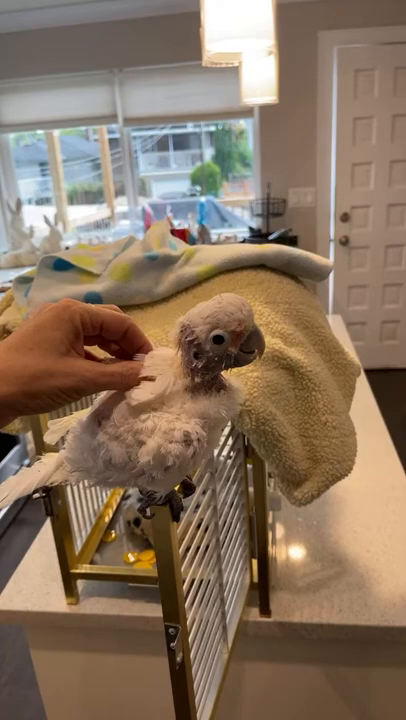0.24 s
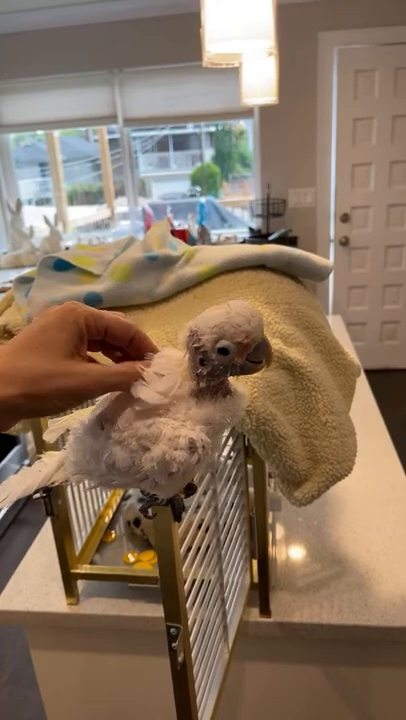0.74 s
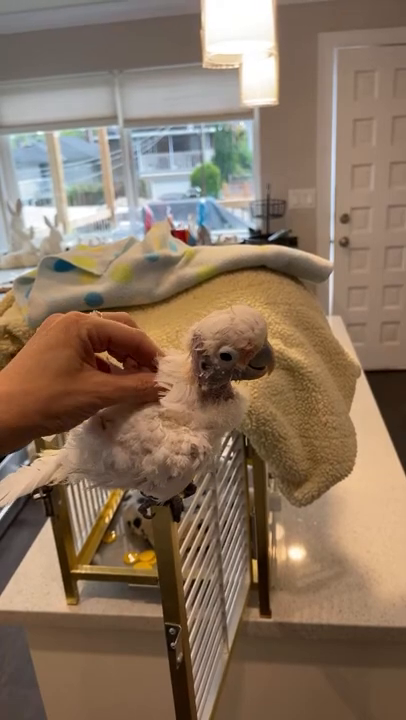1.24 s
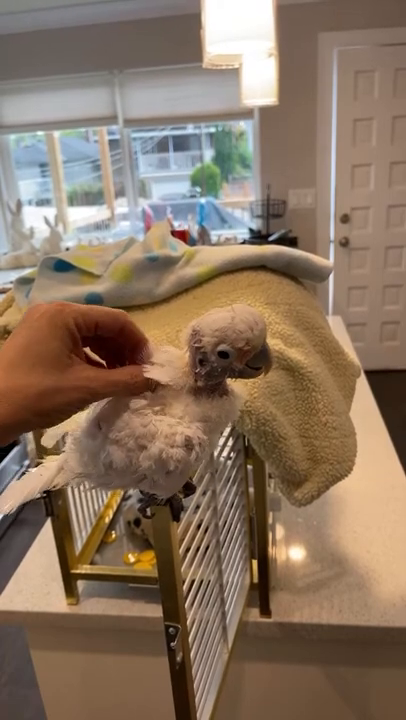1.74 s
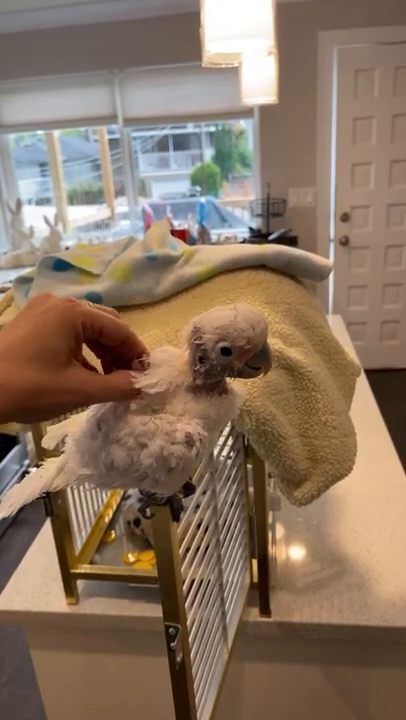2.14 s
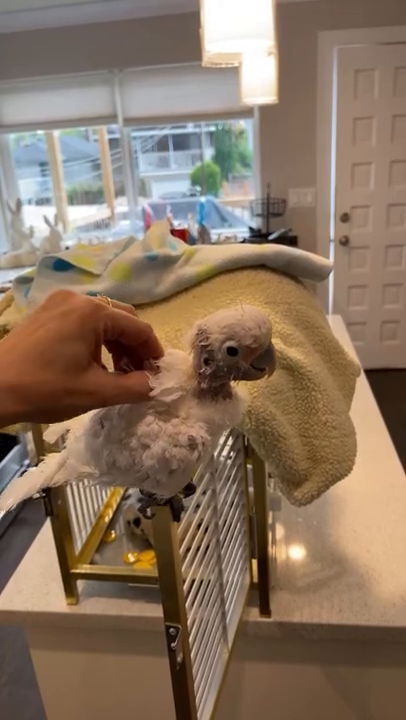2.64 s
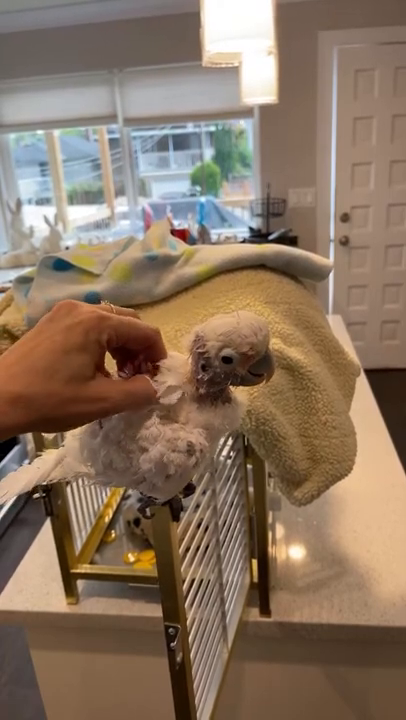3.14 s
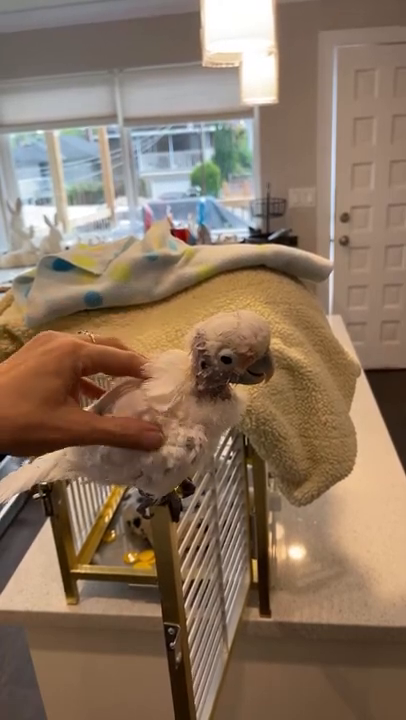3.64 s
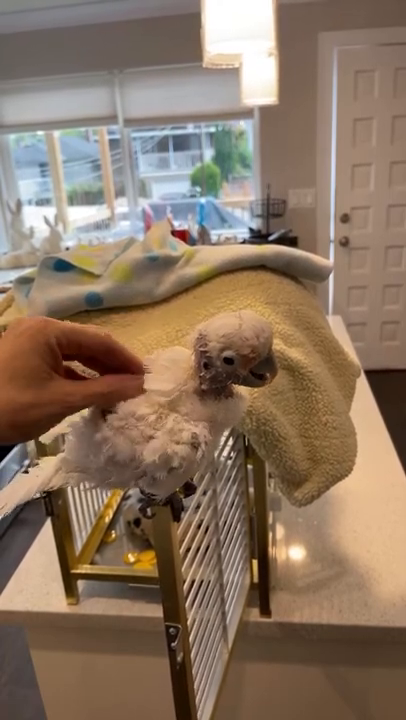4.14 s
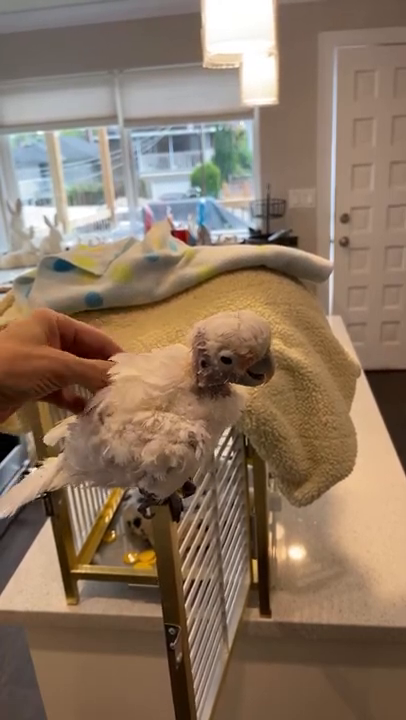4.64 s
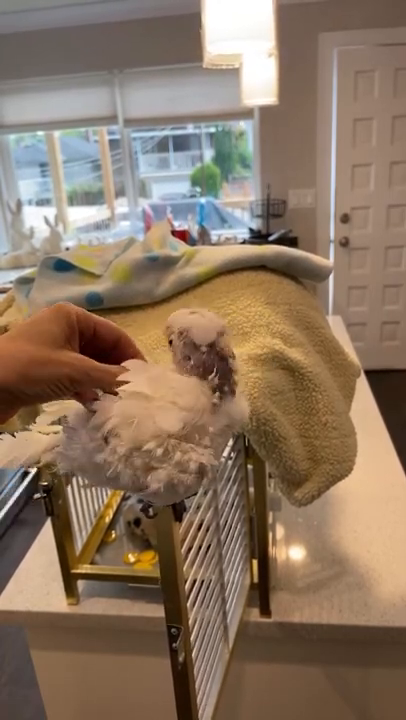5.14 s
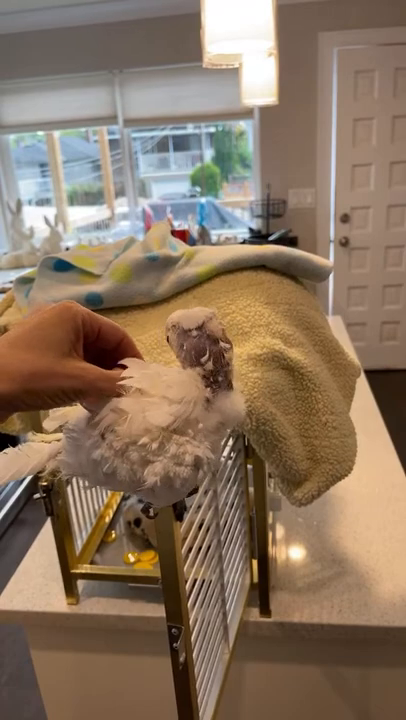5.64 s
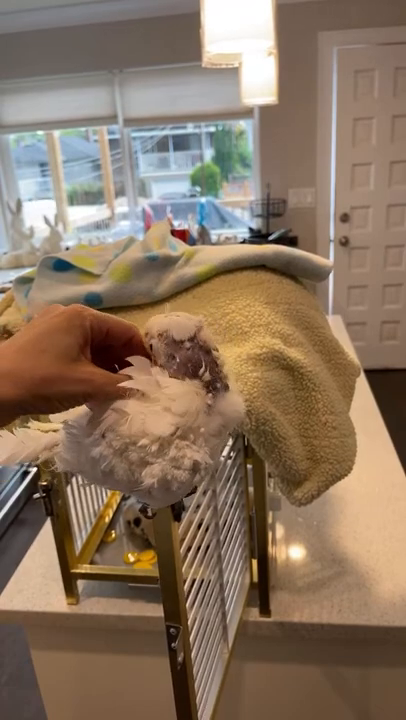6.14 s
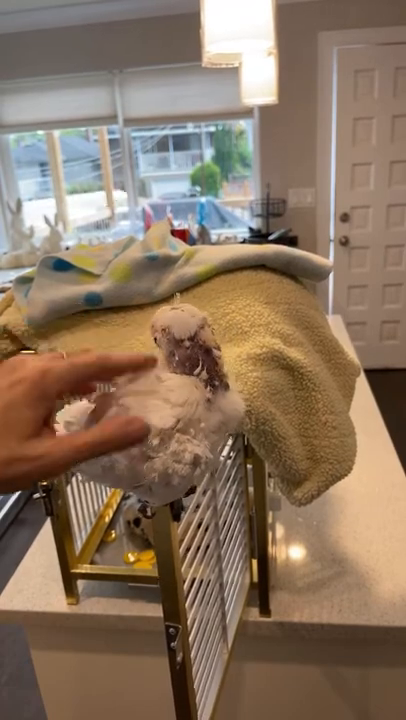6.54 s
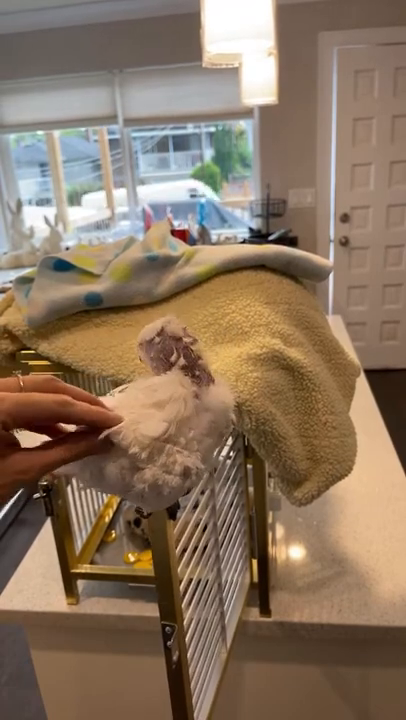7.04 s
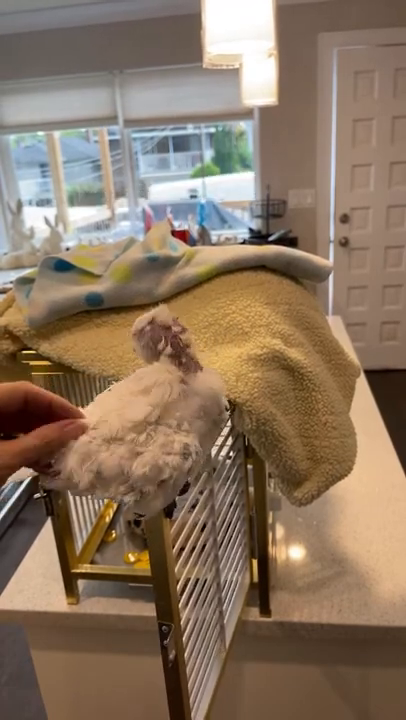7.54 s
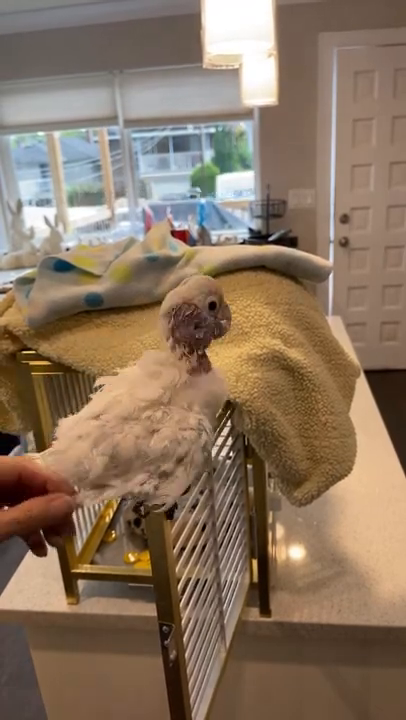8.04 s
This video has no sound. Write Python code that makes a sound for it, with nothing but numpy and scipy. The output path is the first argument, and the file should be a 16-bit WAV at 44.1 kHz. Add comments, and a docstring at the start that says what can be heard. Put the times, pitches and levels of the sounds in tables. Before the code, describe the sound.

A parrot screeches loudly and close by in a hard-walled kitchen, each call ringing briefly over a faint, steady appliance hum and low rush of air. At the very start, a thin whine breaks into a harsh, raspy squawk. After a pause, more squawks run from about 1.1 seconds into a shrill squeal at 1.6 and a rising nasal caw at 1.9. From 3.3 to 4.3 seconds come two double squawks with a squeal between them. Another cluster starts near 5 seconds with squawks, a short whine and a squeal, ending in a second nasal caw at 5.8. A piercing squeal with a weak whine follows at 6.6 seconds, then a last rough double squawk from 7 to 7.4. Around 8 seconds, feathers rustle very softly under a hand, and only the hum remains.

```python
"""A cockatoo protests on its cage in a hard-walled kitchen while a hand strokes it; an appliance hums.
First one side of its syrinx whines, into a harsh, nearly chaotic squawk and a faint peep.
More squawks break into a squeal from the other side, then a rising nasal caw; the room rings after each.
From 3.3 s come further squawks, whines and squeals, with a second caw at 5.8 s.
Last, near 8 s, feathers rustle as the hand slides off the tail."""
import sys
import numpy as np
from scipy import signal
from scipy.fft import rfft, irfft, next_fast_len
from scipy.io import wavfile
from scipy.ndimage import uniform_filter1d, map_coordinates

SR = 44100
rng = np.random.default_rng(int(sys.argv[2]) if len(sys.argv) > 2 else 0)


def master(y):
    """Save y as 16-bit WAV."""
    cut = np.clip(np.atleast_2d(y).T, -1, 1)
    pcm = np.round(cut * 32767)  # scale
    wavfile.write(sys.argv[1], SR, pcm.astype(np.int16))


N = 365443

# room air spectrum: freq_hz, density_db
AIR_SPECTRUM = [(20, -49), (42, -22), (62, -11), (90, 0), (130, -3), (210, -9), (480, -11.5), (900, -16.5),
                (1200, -16), (1800, -23), (3600, -29), (6000, -39.5), (8000, -54.5), (15600, -70)]
# appliance lines: freq_hz, level_db
HUM_LINES = [(94, -65), (592, -70), (662, -66), (775, -67), (1184, -73), (3553, -80.5)]
# kitchen decay: freq_hz, t60_s
ROOM_DECAY = [(300, 0.37), (1000, 0.45), (3000, 0.44), (6000, 0.42), (12000, 0.34)]
# whines: start_s, length_s, level_db, swell_db, pitch_hz, scoop_frac, octave_db, rough_frac
WHINES = [(0.0, 0.08, -14.5, -7, 1909, 0, -38, 0.23), (0.085, 0.185, -25.5, 0, 1921, 0.0038, -27, 0.4),
          (1.518, 0.091, -26.5, 6, 2350, .22, -7, 0.4), (5.205, 0.067, -16, 12, 2108, 0.023, -24, .4),
          (6.587, 0.19, -35, -11, 2447, 0.27, -2.5, .9), (6.807, 0.049, -31, 10, 2400, 0, -10, 0.8)]
# squawk pushes, single or paired:
# start_s, length_s, level_db, depth_db, rasp_db, fizz_db, top_hz, scoop_frac, rough_frac
SQUAWKS = [ (0.075, 0.225, -22.5, 4, -4, 0, 483.8, .24, .85),
           (1.068, 0.225, -20, 1.5, 1.5, -6, 504.2, .15, .9), (1.218, 0.24, -23, 1, 3, 0.5, 532, .02, .8),
           (1.52, 0.175, -24, 9, -6.5, 5, 492, .12, 0.96), (3.33, 0.23, -19, -1.5, -1, 1, 541.7, .26, 0.98),
           (3.49, 0.22, -21, -1, 4, 1, 550.1, .02, .85), (3.899, 0.245, -22, -1.5, -2.5, 7, 496.4, .22, .7),
           (4.085, 0.2, -22, -5, 0.5, 5, 512.6, 0.018, 0.57),
           (4.952, 0.23, -20.5, 0.5, 0, 2, 531, .24, .75),
           (5.11, 0.2, -23.5, 0.5, 6.5, 4, 524.3, 0.0087, .5),
           (5.462, 0.18, -19, -1.5, 0.5, 4, 513.3, .2, .85),
           (7.015, 0.215, -20.5, -1, 1, -4, 483.5, .19, 0.96),
           (7.18, 0.2, -26.5, 2, 8, 1, 493.9, .03, 0.45)]
# throat and beak response in a squawk: freq_hz, gain_db
SQUAWK_THROAT = [(100, -83.5), (350, -26), (540, -27), (740, -17), (1120, -2), (1600, -5), (2100, 2.5),
                 (2650, -11), (3050, -4), (3750, -13.5), (4600, -11), (7300, -24.5), (11500, -35),
                 (15600, -39)]
# peeps: start_s, length_s, level_db, pitch_hz, rise_hz_per_s
PEEPS = [(0.543, 0.42, -73.5, 3100, 150), (2.532, 0.2, -73, 8050, 2510)]
# squeals: start_s, length_s, level_db, swell_db, crest_s, top_hz, end_hz, rough_frac
SQUEALS = [(1.571, 0.18, -17, -4, .07, 3215, 2925, .65), (3.664, 0.17, -17.5, -1, .06, 3478, 2972, .75),
           (5.551, 0.19, -15.5, 5, .055, 3320, 2892, 0.4), (6.632, 0.19, -15, 8, 0.074, 3218, 3016, .3)]
# caws: start_s, length_s, level_db, depth_db, rasp_db, top_hz, scoop_frac
CAWS = [(1.853, 0.36, -16, 1, 2, 509.5, .42), (5.774, 0.355, -18, 2, 1, 495.3, .3)]
# throat and beak response in a caw: freq_hz, gain_db
CAW_THROAT = [(100, -65), (300, -41.5), (410, -15), (540, -23.5), (760, -9.5), (1000, -8), (1480, -1),
              (2000, 4.5), (2400, -16.5), (3400, -4), (4000, -12), (4600, -6), (5900, -41), (7100, -23.5),
              (7900, -34.5), (8900, -33.5), (11000, -26.5), (15500, -41)]
# finger strokes: centre_s, level_db, sigma_s
STROKES = [(3.245, -82, 0.022), (7.764, -67, 0.057), (7.942, -55, .022), (8.129, -68, 0.0084),
           (8.183, -75, 0.0039)]
# feather rustle spectrum: freq_hz, density_db
FEATHER_SPECTRUM = [(1500, -10), (4000, 8.5), (6500, 6), (10000, -1), (15500, -1.5)]

DEPTH_HZ, FIZZ_HZ, TOP_HZ = 1360, 7500, 15720  # band edges
PIPE_SPACING_HZ = 2074  # between the windpipe's upper resonances


def amp(db):
    """Decibels to gain."""
    return 10 ** (np.asarray(db) / 20)


def unit(x):
    """x at rms 1."""
    return x / np.sqrt(np.mean(x ** 2) + 1e-20)


def along(points, hz):
    """Interpolate (freq_hz, value) points on a log axis."""
    freqs_hz, values = np.transpose(points)
    return np.interp(np.log(hz + 1), np.log(freqs_hz + 1), values)


def wobble(rate_hz, t):
    """Smooth random curve, rate_hz knots a second."""
    at = (t - t[0]) * rate_hz
    return map_coordinates(rng.standard_normal(int(at[-1]) + 4), [at])


def filtered(x, response):
    """Apply a gain given as a function of frequency."""
    size = next_fast_len(len(x) + 4096)
    return irfft(rfft(x, size) * response(np.fft.rfftfreq(size, 1 / SR)), size)[:len(x)]


def coloured(x, spectrum):
    """x shaped by a spectrum table, at rms 1."""
    return unit(filtered(x, lambda hz: amp(along(spectrum, hz))))


def below(hz, edge_hz):
    """Steep low-pass gain."""
    return 1 / (1 + (hz / edge_hz) ** 8)


def room_tone(air_db, waver_db, swell_db_per_s):
    """Low rush of air plus an appliance's unsteady, slowly growing hum."""
    t = np.arange(N) / SR
    air = coloured(rng.standard_normal(N), AIR_SPECTRUM)
    hum = np.zeros(N)
    for hz, level_db in HUM_LINES:
        gain = amp(level_db + swell_db_per_s * (t - t.mean()) + waver_db * wobble(2.6, t))
        hum += gain * np.sqrt(2) * np.sin(2 * np.pi * hz * t + 1.1 * wobble(17, t))
    return amp(air_db) * air + hum


def kitchen(x, wet_db):
    """Direct sound plus a dense tail, new for each call because the bird turns its head."""
    hz, t, bins = signal.stft(rng.standard_normal(int(.8 * SR)), SR, nperseg=256)
    decay = amp(-60 * t / along(ROOM_DECAY, hz)[:, None])
    tail = signal.istft(bins * decay, SR, nperseg=256)[1]
    impulse = amp(wet_db) * np.pad(tail / np.linalg.norm(tail), (int(.003 * SR), 0))
    impulse[0] = 1
    return signal.fftconvolve(x, impulse / np.linalg.norm(impulse))


def breath(length_s, attack_s, release_s):
    """Time axis and soft gate of one call."""
    t = np.arange(int(length_s * SR)) / SR
    ramp = lambda x: np.sin(np.pi / 2 * np.clip(x, 0, 1)) ** 2
    return t, ramp(t / attack_s) * ramp((length_s - t) / release_s)


def whistle(t, pitch_hz, rough, octave_db, jitter, flutter_hz, shimmer_db, edge_db, hiss_db):
    """One tightened side of the syrinx: fluttering tone, octave, faint upper overtones, hiss."""
    phase = 2 * np.pi * np.cumsum(pitch_hz * (1 + jitter * rough * wobble(flutter_hz, t))) / SR
    edge = sum(np.sin(k * phase) * 3 / k for k in range(3, 7))
    tone = np.sin(phase) + amp(octave_db) * (np.sin(2 * phase) + amp(edge_db) * edge)
    hiss = coloured(rng.standard_normal(len(t)), SQUAWK_THROAT)
    shimmer = unit(amp(shimmer_db * rough * wobble(900, t)))
    return np.sqrt(2) * tone * shimmer + amp(hiss_db) * hiss


def whine(length_s, level_db, swell_db, top_hz, scoop, octave_db, rough, scoop_s=.03):
    """Lower-pitched side of the syrinx: slides up by its scoop, then holds."""
    t, gate = breath(length_s, attack_s=.028, release_s=.011)
    pitch_hz = top_hz * (1 - scoop * np.exp(-t / scoop_s))
    tone = whistle(t, pitch_hz, rough, octave_db,
                   jitter=.067, flutter_hz=596, shimmer_db=1.5, edge_db=-22.5, hiss_db=-24.5)
    return kitchen(tone * gate * amp(level_db + swell_db * (t / length_s - .5)), wet_db=-1)


def syrinx_buzz(t, pitch_hz, rough, jitter, flutter_hz, waver, turbulence):
    """Buzzing membranes; roughness scatters the cycles and adds a puff of hiss to each."""
    scatter = 1 + jitter * rough * wobble(flutter_hz, t) + waver * wobble(60, t)
    phase = 2 * np.pi * np.cumsum(pitch_hz * scatter) / SR
    buzz = sum(np.cos(k * phase + rng.normal(0, 1.6)) * (k * pitch_hz < TOP_HZ) for k in range(1, 40))
    puffs = rng.standard_normal(len(t)) * (1 + 1.6 * np.cos(phase))
    noise_frac = np.clip(turbulence * rough ** 2, 0, 1)
    source = np.sqrt(1 - noise_frac) * unit(buzz) + np.sqrt(noise_frac) * unit(puffs)
    return source * amp(2.3 * rough * wobble(220, t))


def mottled(x, spread_db):
    """Chaotic vibration throws energy into narrow bands that come and go."""
    bins = signal.stft(x, nperseg=512)[2]
    field = uniform_filter1d(rng.standard_normal(bins.shape), size=3, axis=0)
    field = uniform_filter1d(field, size=9, axis=1)
    return signal.istft(bins * amp(spread_db * unit(field)), nperseg=512)[1][:len(x)]


def throat(source, pitch_hz, response, gape, pipe_db):
    """Throat and windpipe resonances, lifted as the beak opens with rising pitch."""
    def gain(hz):
        mode = hz / PIPE_SPACING_HZ
        ripple_db = pipe_db * np.clip(mode - 2, 0, 1) * np.cos(2 * np.pi * (mode - .08))
        return amp(along(response, hz) + ripple_db)

    opening = np.minimum(pitch_hz / 505, 1) ** gape
    clock = np.cumsum(opening)  # warp, filter, unwarp: resonances scale with the opening
    warped = map_coordinates(source, [np.interp(np.arange(clock[-1]), clock, np.arange(len(source)))])
    return map_coordinates(filtered(warped, gain), [clock])


def brightened(voice, effort_db, depth_db, rasp_db, fizz_db, split_hz):
    """Effort brightens a call. Depth acts below DEPTH_HZ, rasp above split_hz, fizz above FIZZ_HZ."""
    body = filtered(voice, lambda hz: below(hz, split_hz))
    upper = unit(voice - body)
    middle = filtered(upper, lambda hz: below(hz, FIZZ_HZ))
    push_db = np.clip(effort_db + rasp_db - np.max(effort_db + rasp_db) - 5, -12, 0)
    fizz = amp(fizz_db + .5 * push_db) * (upper - middle)
    body = filtered(body, lambda hz: amp(depth_db * below(hz, DEPTH_HZ)))
    return unit(body) + amp(rasp_db) * (middle + fizz)


def slack(progress, crest):
    """Parabola: 1 at the start of a call, 0 at its crest, growing after."""
    return (progress / crest - 1) ** 2


def squawk(length_s, level_db, depth_db, rasp_db, fizz_db, top_hz, scoop, rough,
           swell_s=.098, swell_db=34.5, sag_db_per_s=16.5, dull_db=4.5, settle=.25):
    """One harsh push: swells, scoops up, is brightest midway, sags and settles as air runs out."""
    t, gate = breath(length_s, attack_s=.032, release_s=.062)
    progress = t / length_s
    onset_db = swell_db * np.maximum(1 - t / swell_s, 0) ** 2
    effort_db = level_db - onset_db - sag_db_per_s * (t - length_s / 2)
    rasp_db = rasp_db - dull_db * slack(progress, crest=.47)
    pitch_hz = top_hz * (1 - scoop * slack(progress, crest=.78))
    rough = rough - settle * (progress - .5)
    source = syrinx_buzz(t, pitch_hz, rough, jitter=.0622, flutter_hz=395.8, waver=.008, turbulence=1)
    voice = throat(mottled(source, spread_db=3.5), pitch_hz, SQUAWK_THROAT, gape=.55, pipe_db=3)
    voice = brightened(voice, effort_db, depth_db, rasp_db, fizz_db, split_hz=2145)
    return kitchen(voice * gate * amp(effort_db), wet_db=.3)


def peep(length_s, level_db, pitch_hz, rise_hz_per_s):
    """Thin whistle that swells and fades while drifting upward."""
    t, gate = breath(length_s, attack_s=length_s / 2, release_s=length_s / 2)
    tone = whistle(t, pitch_hz + rise_hz_per_s * t, rough=.3, octave_db=-40,
                   jitter=.03, flutter_hz=610, shimmer_db=4.5, edge_db=-40, hiss_db=-29)
    return kitchen(tone * gate * amp(level_db), wet_db=-5)


def squeal(length_s, level_db, swell_db, crest_s, top_hz, end_hz, rough,
           rest_hz=2880, lift_s=.037, fall_s=.06):
    """Higher-pitched side of the syrinx: lifts fast to a bright crest, falls back more slowly."""
    t, gate = breath(length_s, attack_s=.025, release_s=.029)
    rising = t < crest_s
    lift = np.exp(-((t - crest_s) / np.where(rising, lift_s, fall_s)) ** 2)
    pitch_hz = np.where(rising, rest_hz, end_hz) * (1 - lift) + top_hz * lift
    tone = whistle(t, pitch_hz, rough, octave_db=-24.5 + 3.5 * lift,
                   jitter=.055, flutter_hz=599.2, shimmer_db=8, edge_db=-20.5, hiss_db=-46.5)
    return kitchen(tone * gate * amp(level_db + swell_db * (t / length_s - .5)), wet_db=-1.5)


def caw(length_s, level_db, depth_db, rasp_db, top_hz, scoop,
        swell_db=10, dull_db=26, ring_s=.032, ring_dip_db=1, ring_dull_db=8):
    """Nasal buzz, hoarse at both ends; pitch and level climb together until the throat rings."""
    t, gate = breath(length_s, attack_s=.04, release_s=.06)
    progress = t / length_s
    loose = slack(progress, crest=.8)
    ring = np.exp(-((t - .74 * length_s) / ring_s) ** 2)
    effort_db = level_db - swell_db * loose - ring_dip_db * ring
    rasp_db = rasp_db - dull_db * slack(progress, crest=.59) - ring_dull_db * ring
    pitch_hz = top_hz * (1 - scoop * loose)
    rough = .1 + .65 * slack(progress, crest=.52)
    source = syrinx_buzz(t, pitch_hz, rough, jitter=.09, flutter_hz=398.4, waver=.009, turbulence=.9)
    voice = throat(mottled(source, spread_db=3.8), pitch_hz, CAW_THROAT, gape=.2, pipe_db=6.5)
    voice = brightened(voice, effort_db, depth_db, rasp_db, fizz_db=1, split_hz=2020)
    return kitchen(voice * gate * amp(effort_db), wet_db=0)


def feathers():
    """Soft, grainy swishes of fingers along the tail."""
    t = np.arange(N) / SR
    touch = sum(amp(level_db) * np.exp(-.5 * ((t - centre_s) / sigma_s) ** 2)
                for centre_s, level_db, sigma_s in STROKES)
    barbs = rng.standard_normal(N) * amp(3.4 * wobble(790, t))
    return kitchen(touch * coloured(barbs, FEATHER_SPECTRUM), wet_db=-5.5)[:N]


def scene():
    """Calls, feathers and room tone, mono."""
    bird = np.zeros(N)
    for call, rows in (squawk, SQUAWKS), (caw, CAWS), (squeal, SQUEALS), (whine, WHINES), (peep, PEEPS):
        for start_s, *shape in rows:
            at = round(start_s * SR)
            sound = call(*shape)[:N - at]
            bird[at:at + len(sound)] += sound
    return (bird + feathers() + room_tone(air_db=-53, waver_db=3, swell_db_per_s=.65))[None]


def record(dry):
    """Round off the highest peaks; cut everything above TOP_HZ."""
    rounded = dry[0] / (1 + np.abs(dry[0] / .9) ** 8) ** (1 / 8)
    return filtered(rounded, lambda hz: hz < TOP_HZ)[None]


dry = scene()
out = record(dry)
master(out)
```